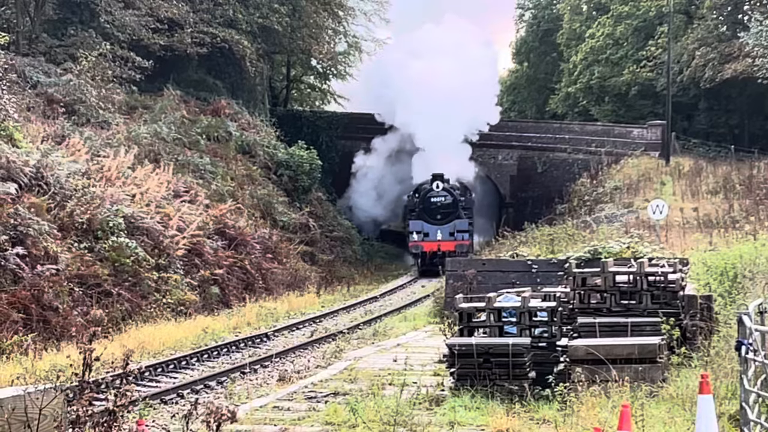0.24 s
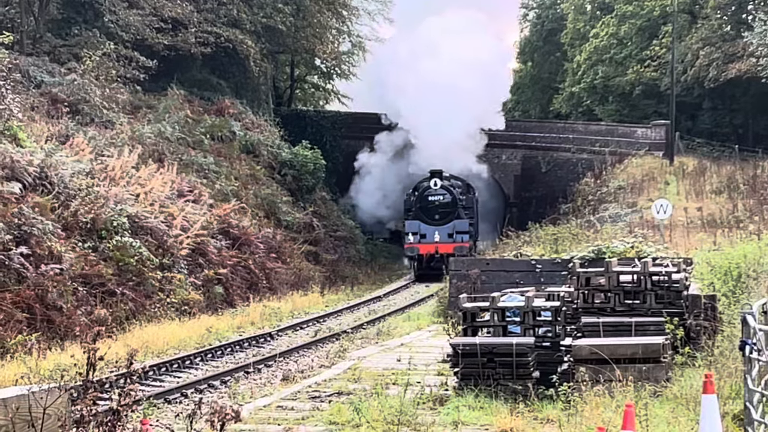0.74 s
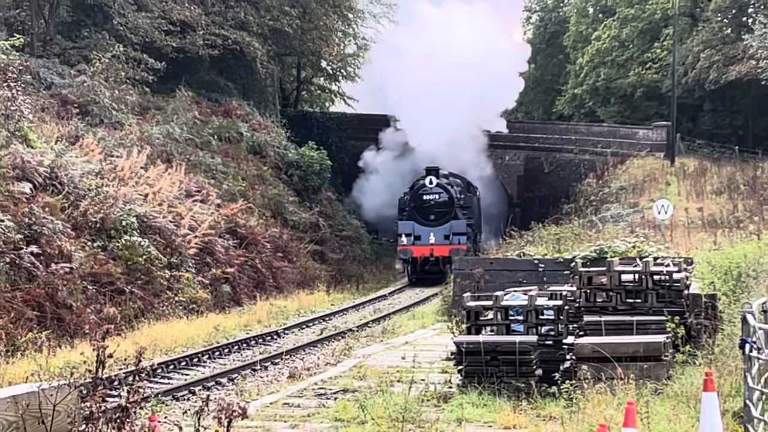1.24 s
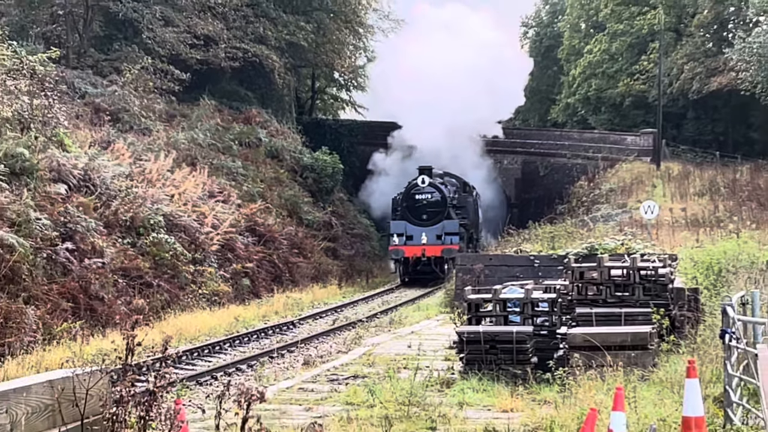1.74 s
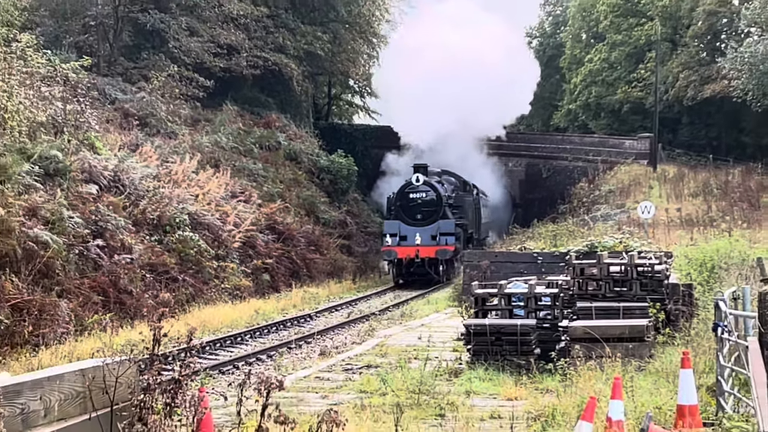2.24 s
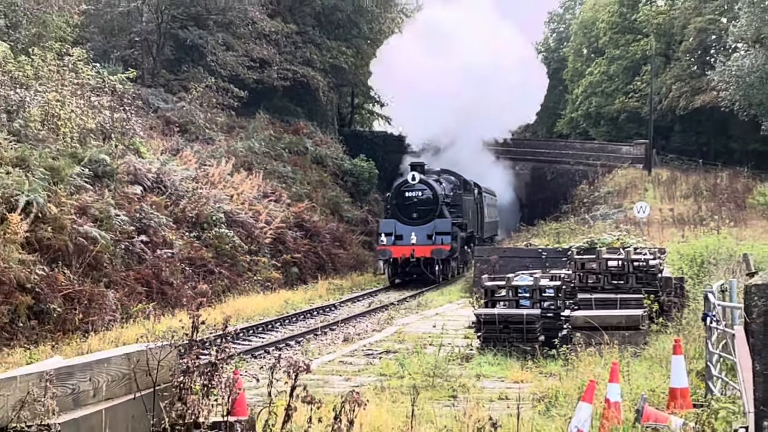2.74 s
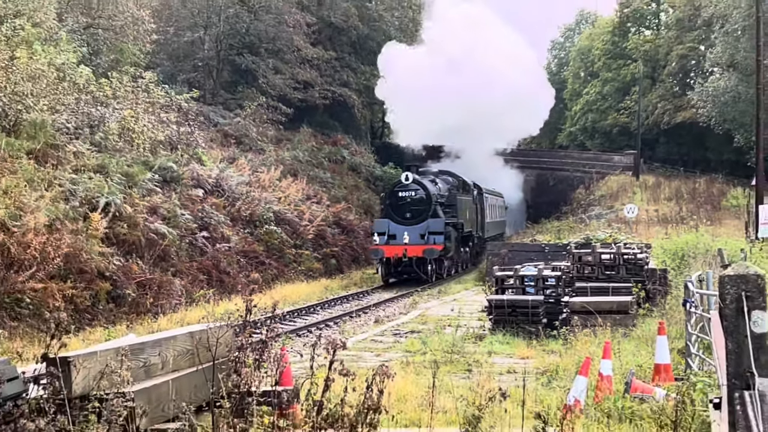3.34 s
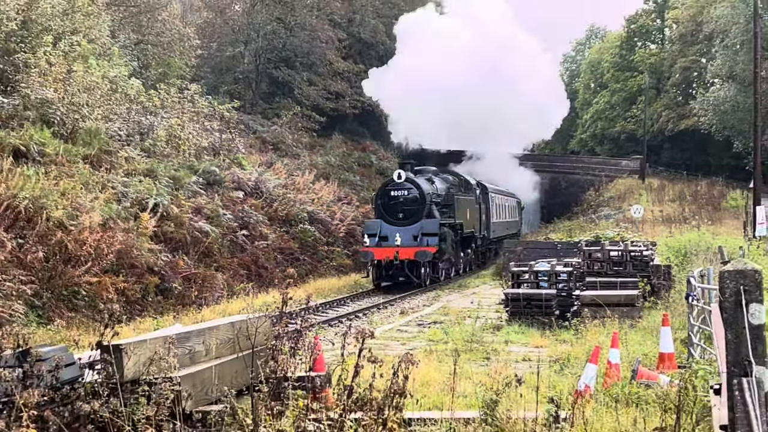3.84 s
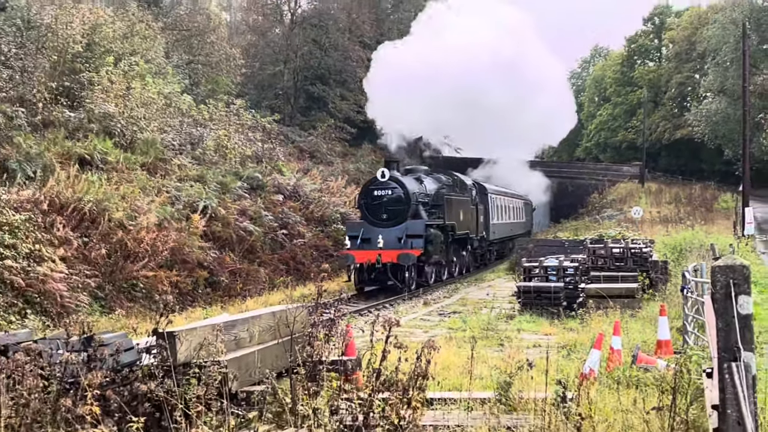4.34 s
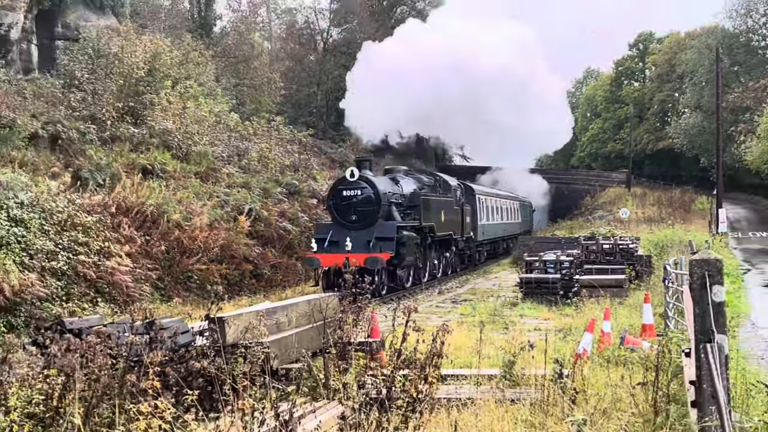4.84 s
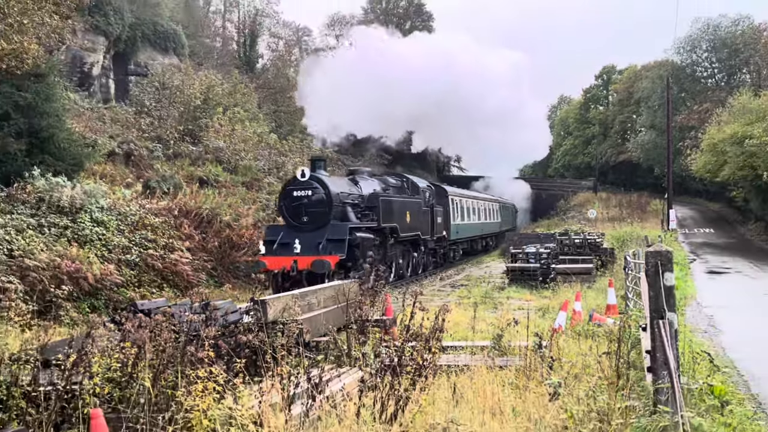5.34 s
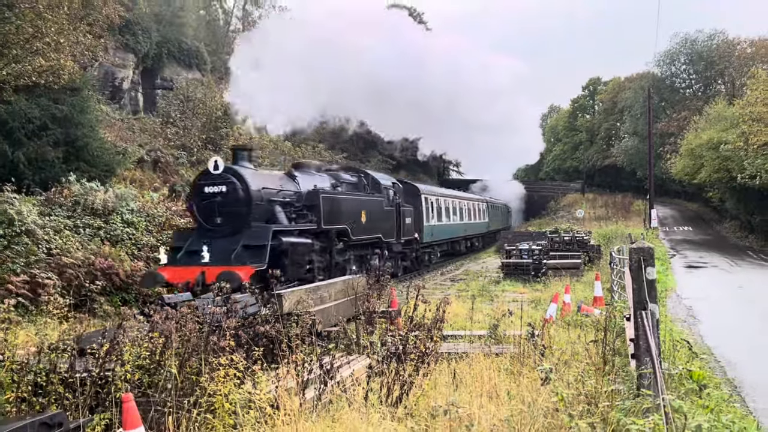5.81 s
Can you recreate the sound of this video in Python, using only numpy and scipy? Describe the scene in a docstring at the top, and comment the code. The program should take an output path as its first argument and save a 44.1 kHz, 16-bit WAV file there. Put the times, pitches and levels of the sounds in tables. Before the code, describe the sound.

At 0 s a steam whistle is already closing: a clear hoot around 870 Hz that sags slightly flat within a tenth of a second, with a faint late reflection at about 0.2 s. Its two close pitches ring on, smeared and wavering between wooded banks, fading over roughly two seconds. From the start a steam locomotive chuffs fast, about nine beats a second, at first more distant and softer. Each beat is a short noisy puff with a low thump, hollow boom, gruff bark and raspy edge, some stronger than others. From 1 to 3 s the chuffs gain force; from 3 to 5 s they become close, heavy and crisp, with brightening steam hiss pulsing along. Wheel rumble rises steadily. Towards 6 s the engine is loudest and full-bodied, its rasp a little duller, ending abruptly without fading. Open-air stereo beside the track, with short dull bank echoes.

```python
"""First a steam whistle is heard shutting off, its note going flat and ringing on between wooded banks.
Under it a steam locomotive hauling coaches comes nearer, its exhaust beating about nine times a second.
Each beat is a burst of shaped noise in five layers; steadier noise makes the hissing steam and the wheels.
As the engine nears, the hiss brightens because less air lies between, and the ground reflection sweeps down."""
import sys
import numpy as np
from scipy import signal
from scipy.fft import rfft, irfft, next_fast_len
from scipy.io import wavfile
from scipy.ndimage import uniform_filter1d

SR = 44100
rng = np.random.default_rng(int(sys.argv[2]) if len(sys.argv) > 2 else 0)


def generate_wav(signal):
    """Clip the signal to [-1, 1] and save it as 16-bit WAV at the path in sys.argv[1]."""
    frames = np.transpose(np.atleast_2d(signal))
    scaled = np.clip(frames, -1, 1) * 32767
    pcm = np.round(scaled).astype(np.int16)
    wavfile.write(sys.argv[1], SR, pcm)


N = 267687
TIME = np.arange(N) / SR
SIZE = next_fast_len(N + SR // 10, True)  # transform length, with room after the end
FREQS = np.maximum(np.arange(SIZE // 2 + 1) * SR / SIZE, 1)

# the approach at a steady speed
START_M, SPEED_M_S = 89, 11
DISTANCE_M = START_M - SPEED_M_S * TIME
CHIMNEY_HEIGHT_M, MICROPHONE_HEIGHT_M = 4.4, 2.3
CHIMNEY_TO_BANK_M, MICROPHONE_TO_BANK_M = 3.99, 8.33

# first beat, time between beats, and how much shorter each gap is than the last
FIRST_BEAT_S, BEAT_S, QUICKEN_S = .0184, .11189, .00005
BEAT_SCATTER_DB = 0.77  # no two blasts are quite alike
REFERENCE_M = 50  # distance at which the blast levels are set
# random colour of each blast, and of the leaks: depth and width of its peaks and dips
BLAST_COLOUR_DB, BLAST_GRAIN_HZ = 1.7, 45
LEAK_COLOUR_DB, LEAK_GRAIN_HZ = 1.1, 45
# full note, drop as the valve shuts, time scale of the valve, and how early the drop comes
WHISTLE_HZ, SAG_HZ, VALVE_S, SAG_LEAD_S = 876, 40, .008, .02
TREBLE_HZ, UPPER_BASS_HZ, LOW_MIDDLE_HZ = 1870, 143.96, 480
CUTOFF_HZ = 14600

# rumble of wheels on rails, spectrum: (frequency [Hz], relative level [dB])
RUMBLE_SPECTRUM = [(18, -32), (35, 0), (70, 5.5), (120, -5), (220, -6), (310, -13.5), (480, -14.5),
                   (750, -20.5), (1100, -25), (1800, -24), (3000, -33), (6000, -34)]
# loudness of the wheels: (time [s], level [dB])
ROLLING_LEVEL = [(0, -33.5), (1, -29), (2, -28.5), (3, -26), (4, -22), (5, -20), (6.07, -16.5)]
# hiss of escaping steam, spectrum: (frequency [Hz], relative level [dB])
HISS_SPECTRUM = [(1500, -3.5), (3000, 1), (4400, -3.5), (5200, -0.5), (6200, 4.5), (8000, -5), (10000, 3),
                 (12000, -1.5), (14500, -3.5)]
# faint singing of the escaping steam: (frequency [Hz], width [Hz], lift [dB])
LEAK_RESONANCES = [(5200, 250, 5), (6000, 160, 2.5), (7380, 770, 7)]
# steam leaking at the cylinders: (time [s], level at 1 m [dB])
STEAM_LEVEL = [(0, 4.5), (1, -2.5), (2, 1), (3, 2), (4, -0.5), (5, 0), (6.07, -4.5)]
# whistle partials, lowest first: (direct level [dB], ringing level [dB])
WHISTLE_PARTIALS = [(-3.5, -28), (-33, -33), (-17, -33.5), (-16.5, -35.5), (-23, -41), (-23, -38),
                    (-31, -41.5), (-32, -43)]
# the toot arriving directly, then from a bank and the bridge:
# (start [s], end [s], level [dB], tilt [dB per partial])
WHISTLE_ARRIVALS = [(-.08, 0.01, -6.5, -3), (0, 0.081, -20, 1), (0.161, 0.256, -18.5, -2.5)]
# full and flat pitch left ringing in the cutting, widths and fades for the lowest partial:
# (frequency [Hz], half width [Hz], level [dB], time to fade by 60 dB [s])
RINGING_PITCHES = [(876.4, 14.7, -3, 4.76), (838.5, 34, 1.6, 2.54)]
# echoes of each beat from the banks: (delay [s], level [dB])
BANK_ECHOES = [(0.041, -16), (0.06, -19.5), (.17, -15)]
# four beats to a turn of the wheels, with unevenly set valves: (lateness [s], accent [dB])
WHEEL_TURN = [(0.00058, -1), (0.0011, 1.5), (-0.0068, -0.5), (0.0002, -1.53)]
# blasts that stand out or fall back:
# (time [s], thump [dB], boom [dB], bark [dB], rasp [dB])
ODD_BEATS = [(0.35, -14, 1.5, 3.5, 0.5), (0.91, 0, -7, 3, 0), (1.02, -1, -3, 1.5, 2.5),
             (1.25, 5, 6, -0.5, 0.5), (1.47, 3, -0.5, -2, 2.5), (1.8, -3, -2.5, 1, -2.5),
             (1.91, -2, 0, 2.5, 2), (2.02, 5, 3, 1, -0.5), (2.25, 6, 1.5, 2, -2.5), (2.36, 4, 0.5, 0, -0.5),
             (2.58, 5, 2, 2.5, 1), (2.69, 3.5, 4, 1, -1), (2.8, 4.5, 0.5, 2.5, -0.5), (2.91, -9, 5, 1, 1.5),
             (3.13, 10, 0.5, -2, 0.5), (3.24, 5, 0.5, -1, 0.5), (3.46, 5, 5.5, 3, -0.5),
             (3.57, 8, -4.5, 2, 1.5), (3.68, -8, 2.5, -1, 1.5), (3.79, 4, 1, 2.5, 0),
             (4.02, -3, -2.5, -1, 0.5), (4.12, 7.5, 2, 1, 1), (4.35, 5, 1, 0.5, -1),
             (4.45, -6, -0.5, -0.5, -1.5), (4.56, 3, -0.5, 1, -1), (4.78, 1, -2.5, 3, -1.5),
             (5.0, 2, -4.5, -2.5, 0), (5.11, 6.5, -1.5, 0, 1.5), (5.22, -16, 3.5, 2.5, 0.5),
             (5.33, 5, 0, -1.5, -1.5), (5.66, 6, 1, 0, -0.5), (5.77, 0, 1, 0, -1), (5.88, 3, -2.5, 0, 0)]
# how hard the engine works: (time [s], level [dB])
ENGINE_EFFORT = [(0, -6), (1, -2.5), (2.1, 0.5), (3.2, 0), (4, 0.5), (4.9, 1), (5.45, 2), (6.07, 2)]
# spectra of the five parts of a blast, deep to high: (frequency [Hz], relative level [dB])
THUMP_SPECTRUM = [(20, -17), (35, -5), (55, 13), (70, 29.5), (90, 4), (115, -6), (170, -36)]
BOOM_SPECTRUM = [(30, -24), (90, -10.5), (135, 3.5), (200, 3), (260, -2), (310, -7.5), (420, -48)]
BARK_SPECTRUM = [(240, -13), (320, 2.5), (390, 3), (560, -1.5), (700, -12.5), (1100, -17.5)]
RASP_SPECTRUM = [(450, -2.5), (700, 3.5), (1000, 2), (1500, 1), (2100, -7.5), (2700, -5.5), (3600, -10.5),
                 (6000, -24), (9500, -43)]
FIZZ_SPECTRUM = [(3000, -12), (6000, -5.5), (10000, -1.5), (14000, -4)]
# resonances of smokebox and chimney: (frequency [Hz], width [Hz], lift [dB])
CHIMNEY_RESONANCES = [(226, 49, 7.5), (417, 150, 5.5), (553, 85, 2.5), (1390, 190, 4.5), (1854, 130, 6.5),
                      (2330, 450, 6)]
# treble of the rasp, duller at the end: (time [s], level [dB])
RASP_TREBLE = [(0, 0), (4.8, 1), (5.4, -0.5), (6.07, -9)]
# changing colour of the train, upper bass: (time [s], level [dB])
UPPER_BASS = [(0, 2), (1.5, -2), (2.3, 1.5), (3.8, 3), (4.4, 1.5), (4.9, -4.5), (5.6, -5), (6.07, -1.5)]
# changing colour of the train, low middle: (time [s], level [dB])
LOW_MIDDLE = [(0, 4.5), (1, 1.5), (2.2, 1), (3.1, -0.5), (4, -0.5), (5.1, 0), (6.07, 2.5)]
# how alike the noise is on the two sides: (frequency [Hz], likeness [0 to 1])
LIKENESS = [(60, 1), (430, .99), (620, .92), (1200, .8), (1680, .55), (2400, .9), (4400, .98), (6400, .87),
            (14000, .84)]
# phase between the two microphone ports: (frequency [Hz], lead of the left [radians])
PORT_PHASE = [(0, 0), (100, -.16), (160, -.3), (350, -.13), (560, -.42), (930, .68), (1150, .5),
              (1430, -.3), (2000, -.2), (2600, .28), (3500, 0), (5100, 0), (5600, -1), (6600, -1),
              (8400, -3.14), (10000, -4.6), (11100, -6.1), (13000, -6.5), (14600, -9)]
# level between the two microphone ports: (frequency [Hz], left minus right [dB])
PORT_BALANCE = [(105, 0), (160, 1.8), (260, .2), (375, 1.6), (600, -3.5), (820, -4.5), (1150, 0.7),
                (1450, -4), (2200, -1), (3200, -0.5)]


def from_db(db):
    """Turn decibels into a gain."""
    return np.exp(np.asarray(db) * (np.log(10) / 20))


def rms_one(x):
    """Scale to an average power of 1."""
    return x / np.sqrt(np.mean(x ** 2) + 1e-20)


def level_in_time(rows):
    """Join a table of times and levels into a level at every sample."""
    times, levels = np.transpose(rows)
    return np.interp(TIME, times, levels)


def across_hz(points):
    """Join a table of frequencies and values, evenly per octave."""
    hz, value = np.transpose(points)
    return np.interp(np.log(FREQS), np.log(np.maximum(hz, 1)), value)


def drift(rate_hz):
    """Random wander with a spread of 1, weaker above rate_hz."""
    spectrum = rfft(rng.standard_normal(SIZE)) / (1 + (FREQS / rate_hz) ** 2)
    return rms_one(irfft(spectrum, SIZE)[:N])


def turbulence(spectrum, resonances=()):
    """Rough flow makes stereo noise, louder at the resonances."""
    last_hz = spectrum[-1][0]
    steep_fall_db = 20 * np.log2(np.maximum(FREQS / last_hz, 1))
    level_db = across_hz(spectrum) - steep_fall_db
    for hz, width, lift_db in resonances:
        level_db = level_db + lift_db / (1 + (2 * (FREQS - hz) / width) ** 2)
    alike = np.clip(across_hz(LIKENESS), 0, 1)
    mid, side = rfft(rng.standard_normal((2, SIZE)))
    pair = np.sqrt(1 + alike) * mid + np.sqrt(1 - alike) * side * [[1], [-1]]
    return rms_one(irfft(pair * from_db(level_db), SIZE)[:, :N])


def coloured(x, colour_db, grain_hz):
    """Random peaks and dips, about grain_hz wide: each call gives a jet its own colour."""
    bins = np.fft.rfftfreq(x.shape[1], 1 / SR)
    knots = rng.standard_normal(2000)
    ripple = np.interp(bins / grain_hz, np.arange(len(knots)), knots)
    return irfft(rfft(x) * from_db(colour_db * ripple), x.shape[1])


def adjust_treble(x, level):
    """Turn the treble up or down along its level curve."""
    body = irfft(rfft(x, SIZE) / (1 + (FREQS / TREBLE_HZ) ** 6), SIZE)[:, :N]
    return body + from_db(level_in_time(level)) * (x - body)


def adjust_band(x, level, hz, octaves):
    """Raise or lower one band along its level curve."""
    band_shape = 1 / (1 + (2 * np.log2(FREQS / hz) / octaves) ** 4)
    band = irfft(rfft(x, SIZE) * band_shape, SIZE)[:, :N]
    return x + (from_db(level_in_time(level)) - 1) * band


def through_air(x, db_per_m=0.27):
    """Sound spreads with distance and air absorbs its treble (db_per_m holds at 10 kHz)."""
    centres_hz = [1000, 6000, 9000, 12000, 15000]
    spectrum, out = rfft(x, SIZE), 0
    # overlapping bands, each with its own loss
    for hz, own in zip(centres_hz, np.eye(len(centres_hz))):
        band = irfft(spectrum * np.interp(FREQS, centres_hz, own), SIZE)[:, :N]
        out = out + band * from_db(-db_per_m * DISTANCE_M * (hz / 10000) ** 2)
    return out / DISTANCE_M


def mirrored(x, source_m, listener_m, echo_db, turn_rad, soft_hz, fade_hz=3000):
    """Soft ground or a bank returns sound late and turned in phase; the mix sweeps down on approach.

    source_m and listener_m are the distances of each from the reflecting surface."""
    delay_s = 2 * source_m * listener_m / DISTANCE_M / 343  # 343 m/s is the speed of sound
    turn = np.exp(-1j * turn_rad * np.tanh(FREQS / soft_hz))
    reflection = from_db(echo_db) * turn / (1 + (FREQS / fade_hz) ** 4)
    image = irfft(rfft(x, SIZE) * reflection, SIZE)[:, :N]
    late = np.array([np.interp(TIME - delay_s, TIME, side) for side in image])
    return (x + late) / np.hypot(1, from_db(echo_db))


def cutting(x):
    """Overgrown banks send back a few dull echoes."""
    dull = signal.sosfilt(signal.butter(1, 1500, fs=SR, output="sos"), x)
    out = x
    for delay_s, db in BANK_ECHOES:
        late = np.pad(dull, ((0, 0), (int(delay_s * SR), 0)))[:, :N]
        out = out + from_db(db) * late
    return out


def wheels():
    """Engine and coaches rumble unevenly over the rails."""
    level_db = level_in_time(ROLLING_LEVEL) + 1.74 * drift(4.7)
    return from_db(level_db) * turbulence(RUMBLE_SPECTRUM)


def puff(t, rise, hold, decay):
    """The exhaust port opens, blows, and the cylinder empties (all times in seconds)."""
    opening = np.sin(np.pi / 2 * np.clip(t / rise, 0, 1)) ** 2
    return opening * np.exp(-np.maximum(t - hold, 0) / decay)


def steam(train, lead_s=0.016, swell_db=4.0):
    """Steam leaks at the cylinders and swells with each stroke, more with the strong ones."""
    starts, accent_db = train
    stroke = np.maximum(np.searchsorted(starts - lead_s, TIME) - 1, 0)
    since_stroke = TIME - starts[stroke] + lead_s
    swell = puff(since_stroke, rise=0.036, hold=0.036, decay=0.024)
    stroke_db = swell_db * from_db(accent_db[stroke]) * swell
    level_db = level_in_time(STEAM_LEVEL) + stroke_db + .5 * drift(45)
    hiss = turbulence(HISS_SPECTRUM, LEAK_RESONANCES)
    leaks = coloured(hiss, LEAK_COLOUR_DB, LEAK_GRAIN_HZ)
    return through_air(from_db(level_db) * leaks)


def whistle_toots(t, waver_hz=4):
    """A steam-blown pipe goes flat as its valve shuts; its toot arrives by several paths."""
    out = 0
    for start, end, level_db, tilt_db in WHISTLE_ARRIVALS:
        opened = .5 + .5 * np.tanh((t - start) / VALVE_S)
        not_shut = .5 - .5 * np.tanh((t - end) / (2 * VALVE_S))  # shuts half as fast as it opens
        sag = .5 + .5 * np.tanh((t - end + SAG_LEAD_S) / (2 * VALVE_S))
        pitch_hz = WHISTLE_HZ - SAG_HZ * sag + waver_hz * drift(41.0)[:len(t)]
        phase = 2 * np.pi * np.cumsum(pitch_hz) / SR
        pipe = 0
        for k, (direct_db, _) in enumerate(WHISTLE_PARTIALS):
            pipe = pipe + from_db(direct_db + k * tilt_db) * np.sin((k + 1) * phase)
        out = out + from_db(level_db) * np.sqrt(2 * opened * not_shut) * pipe
    return out


def whistle_ringing(t, ring_side=0.25, evenness=0.33):
    """Countless paths smear each partial into a thin line that fades; high ones die away first."""
    count = len(t)
    out = np.zeros((2, count))
    paths = rfft(rng.standard_normal((2, count)))
    bins = np.fft.rfftfreq(count, 1 / SR)
    for k, (_, ring_db) in enumerate(WHISTLE_PARTIALS, 1):
        for hz, width_hz, share_db, t60 in RINGING_PITCHES:
            line = 1 / (1 + ((bins - k * hz) / (k ** .65 * width_hz)) ** 4)
            mid, side = irfft(line * paths, count)
            # partly even out the random swelling
            envelope = uniform_filter1d(abs(signal.hilbert(mid)), size=SR // 25)
            swell = envelope ** np.clip(evenness, 0, 1)
            fade_db = -60 * t * k ** .55 / t60
            pair = rms_one((mid + ring_side * side * [[1], [-1]]) / swell)
            out += from_db(ring_db + share_db + fade_db) * pair
    return out


def whistle():
    """The toot, its two pitches ringing in the cutting, and steam rushing through the whistle."""
    count = min(2 * SR, N)
    t = TIME[:count]
    out = from_db(-35.5 - 110 * TIME) * turbulence(HISS_SPECTRUM)  # the rush of steam soon fades
    out[:, :count] += whistle_toots(t) + whistle_ringing(t)
    return out


def beat_trains():
    """Start and strength of each thump, boom, bark and rasp: four-beat turns, slowly quickening."""
    k = np.arange(int(N / SR / BEAT_S) + 1)
    late_s, accent_db = np.array(WHEEL_TURN)[k % len(WHEEL_TURN)].T
    starts = FIRST_BEAT_S + BEAT_S * k - .5 * QUICKEN_S * k ** 2 + late_s
    odd_db = sum(np.outer(db, abs(starts - s) < BEAT_S / 2) for s, *db in ODD_BEATS)
    return [(starts, accent_db + db) for db in odd_db]


def beats(flow, train, db, nearing, lag, rise, hold, decay):
    """One puff of flow per beat: db at REFERENCE_M, growing as distance to the power -nearing."""
    starts, accent_db = train
    effort_db = np.interp(starts, *np.transpose(ENGINE_EFFORT))
    scatter_db = BEAT_SCATTER_DB * rng.standard_normal(len(starts))
    closeness = REFERENCE_M / np.interp(starts, TIME, DISTANCE_M)
    gains = from_db(db + accent_db + effort_db + scatter_db) * closeness ** nearing
    out = np.zeros((2, N))
    for s, gain in zip(starts, gains):
        start = np.clip(int((s + lag) * SR), 0, N - 2)
        span = slice(start, min(start + SR // 4, N))
        shape = puff(TIME[span] - TIME[start], rise, hold, decay)
        blast = coloured(flow[:, span], BLAST_COLOUR_DB, BLAST_GRAIN_HZ) * shape
        out[:, span] += gain * np.sqrt(np.mean(shape ** 2)) * rms_one(blast)
    return out


def exhaust(thumps, booms, barks, rasps):
    """A blast fizzes and rasps at the chimney lip, barks in its pipe, booms in the smokebox, thumps."""
    eddies = from_db(0.78 * drift(140))  # the jet tears unevenly
    crackle = from_db(1.3 * drift(300))
    boom_flow = turbulence(BOOM_SPECTRUM, CHIMNEY_RESONANCES) * eddies
    bark_flow = turbulence(BARK_SPECTRUM, CHIMNEY_RESONANCES) * eddies
    rasp_flow = turbulence(RASP_SPECTRUM, CHIMNEY_RESONANCES) * eddies * crackle
    thump = beats(turbulence(THUMP_SPECTRUM), thumps, db=-25.0, nearing=0.61,
                  lag=0.01, rise=0.035, hold=0.047, decay=0.012)
    boom = beats(boom_flow, booms, db=-21.5, nearing=1.46,
                 lag=-0.0028, rise=0.028, hold=0.04, decay=0.041)
    bark = beats(bark_flow, barks, db=-23, nearing=0.74,
                 lag=-0.01, rise=0.027, hold=0.04, decay=0.029)
    rasp = beats(rasp_flow, rasps, db=-28.5, nearing=1.0,
                 lag=-0.0099, rise=0.031, hold=0.041, decay=0.033)
    fizz = beats(turbulence(FIZZ_SPECTRUM), rasps, db=-50, nearing=1.6,
                 lag=-0.017, rise=0.018, hold=0.067, decay=0.066)
    over_ground = mirrored(bark + adjust_treble(rasp, RASP_TREBLE), CHIMNEY_HEIGHT_M,
                           MICROPHONE_HEIGHT_M, echo_db=-11.5, turn_rad=0.93, soft_hz=210)
    return thump + boom + over_ground + fizz


def scene():
    """The whole train, heard from beside the line."""
    thumps, booms, barks, rasps = beat_trains()
    train = wheels() + cutting(exhaust(thumps, booms, barks, rasps))
    train = mirrored(train, CHIMNEY_TO_BANK_M, MICROPHONE_TO_BANK_M,
                     echo_db=-15.5, turn_rad=3.32, soft_hz=68, fade_hz=654)
    train = adjust_band(train, UPPER_BASS, UPPER_BASS_HZ, octaves=0.62)
    train = adjust_band(train, LOW_MIDDLE, LOW_MIDDLE_HZ, octaves=0.42)
    return train + steam(rasps) + whistle()


def record(dry):
    """The two ports differ in phase and colour; peaks are rounded and the top is cut."""
    turn = np.interp(FREQS, *np.transpose(PORT_PHASE))
    # each side takes half the difference
    phase = np.exp(.5j * turn * [[1], [-1]])
    balance = from_db(.5 * across_hz(PORT_BALANCE) * [[1], [-1]])
    heard = irfft(rfft(dry, SIZE) * phase * balance, SIZE)[:, :N]
    rounded = heard / (1 + heard ** 6) ** (1 / 6)
    top_cut = signal.ellip(10, .1, 90, CUTOFF_HZ, fs=SR, output="sos")
    return signal.sosfilt(top_cut, rounded)


dry = scene()
out = record(dry)
generate_wav(out)
```